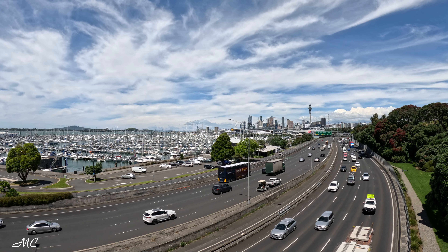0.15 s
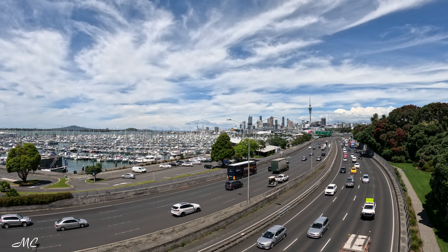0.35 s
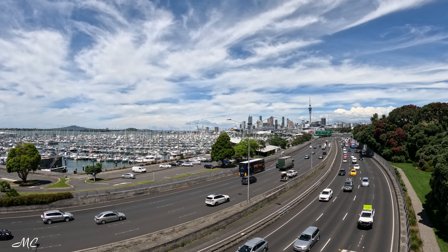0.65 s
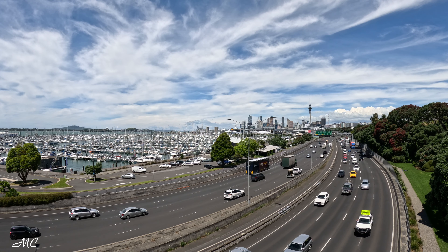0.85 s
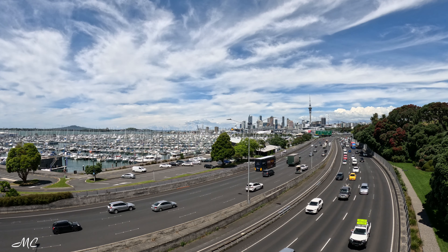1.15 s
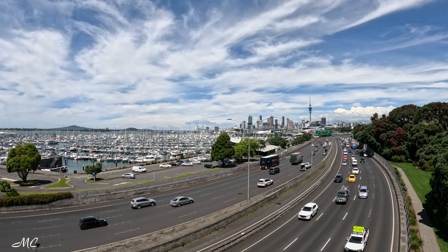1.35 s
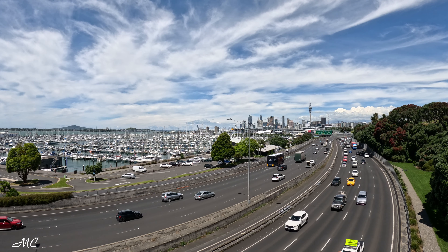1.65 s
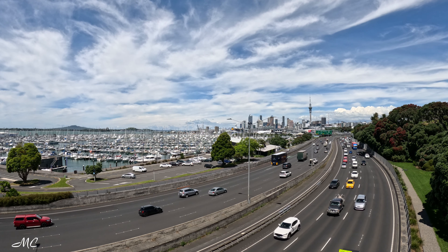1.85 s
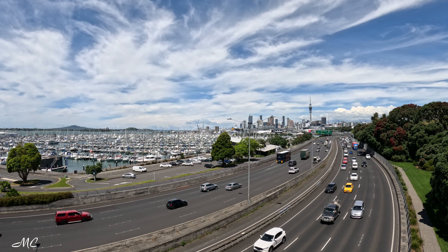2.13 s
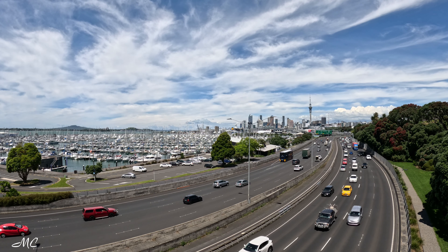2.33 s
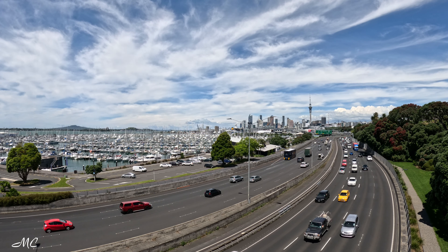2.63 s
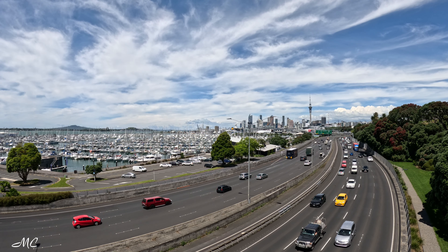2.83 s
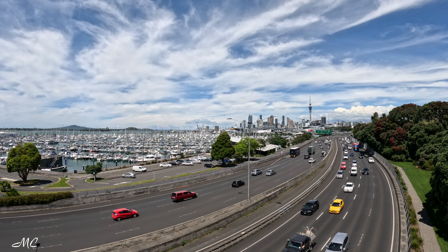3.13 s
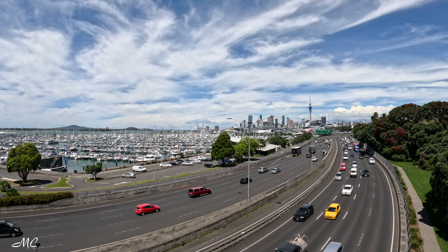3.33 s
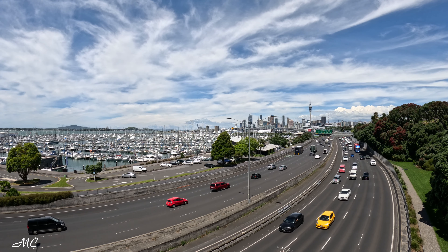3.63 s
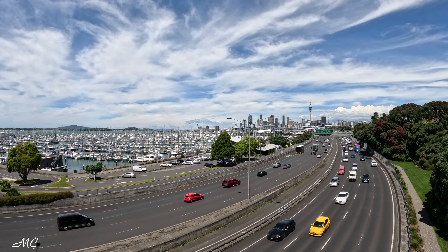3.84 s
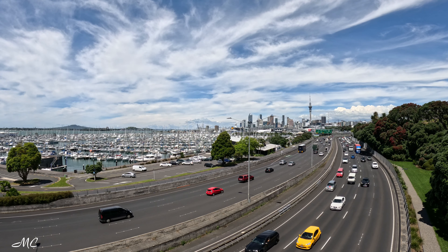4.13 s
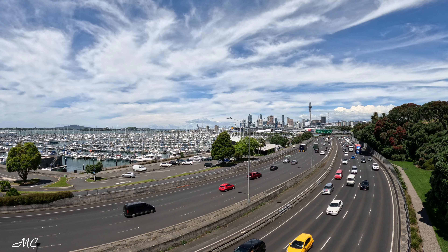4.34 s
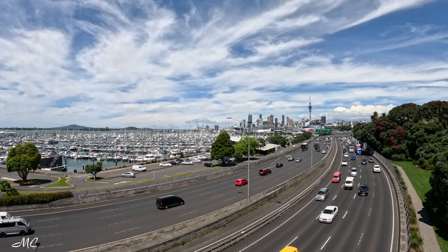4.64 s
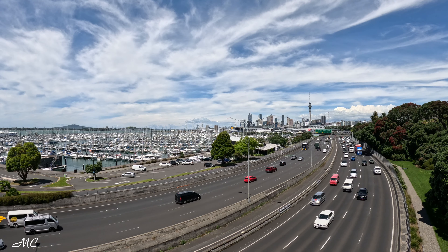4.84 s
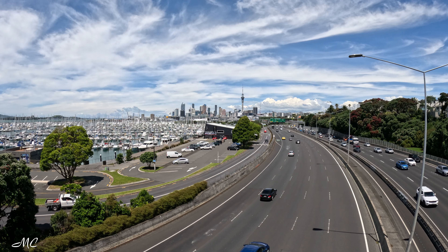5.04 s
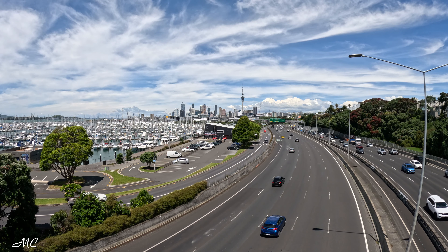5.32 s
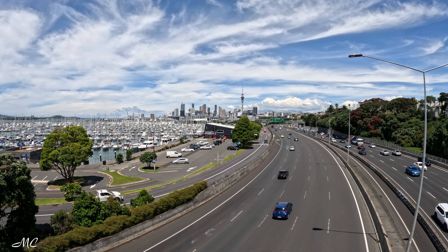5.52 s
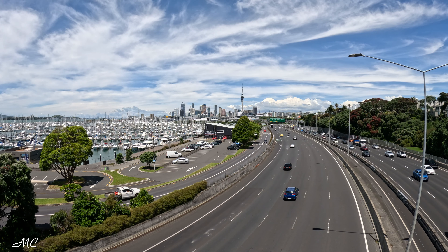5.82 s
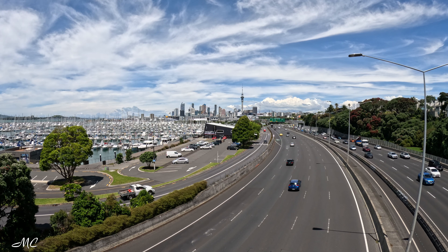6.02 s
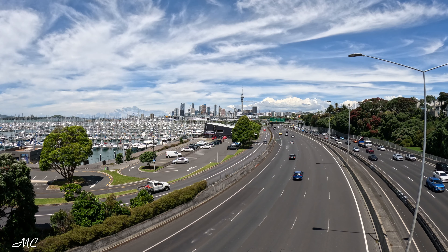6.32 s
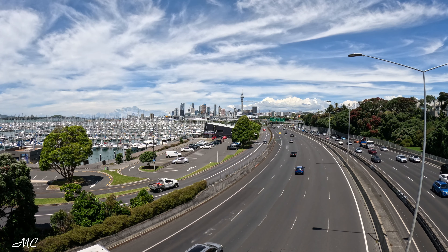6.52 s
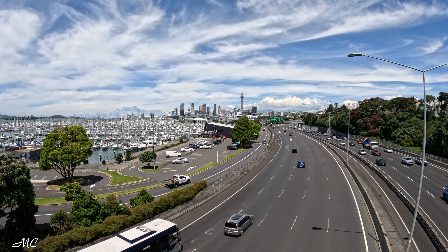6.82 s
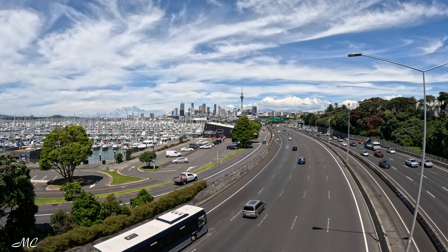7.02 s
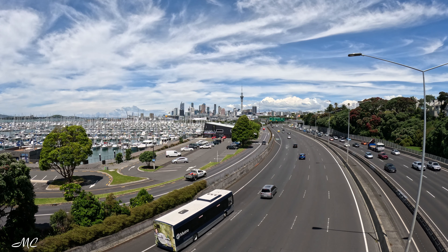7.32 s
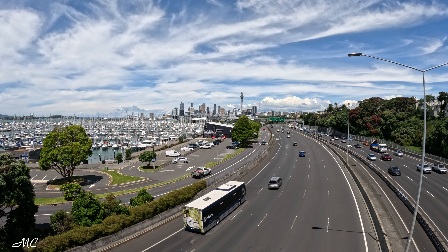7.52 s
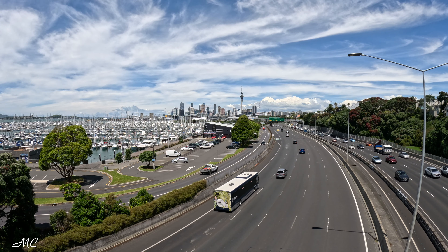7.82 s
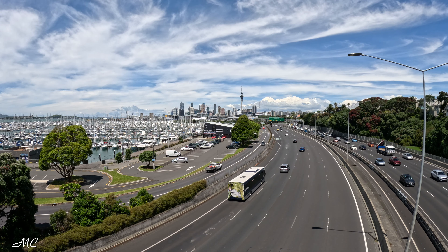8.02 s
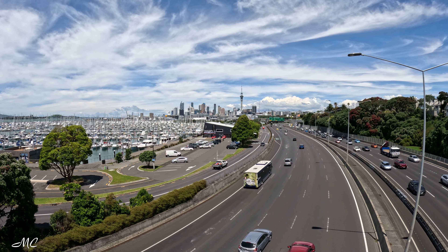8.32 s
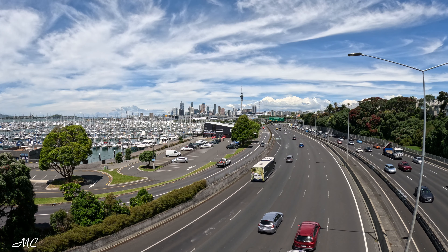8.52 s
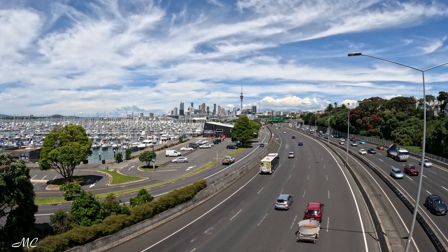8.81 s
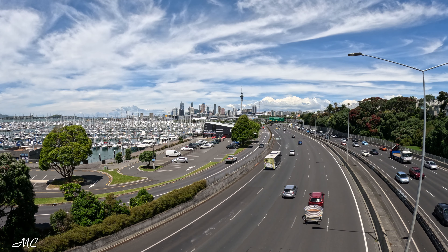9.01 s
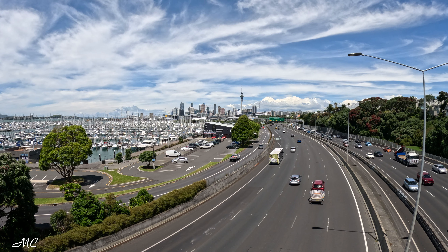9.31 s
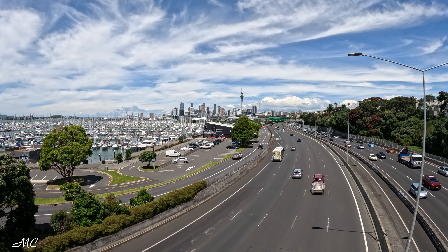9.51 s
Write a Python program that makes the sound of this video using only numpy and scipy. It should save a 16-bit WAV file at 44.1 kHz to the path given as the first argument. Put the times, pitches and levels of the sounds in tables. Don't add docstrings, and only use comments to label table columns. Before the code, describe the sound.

Open-air traffic heard from an overpass. From 0 to 4.9 s a wide, bass-heavy tyre and wind roar stays fairly steady, swelling gently, hissier at the very start when near lanes are busy. Low truck hums glide in and out beneath it; faint grit ticks fall around 0.7 to 1 s and 2.6 to 2.7 s. At 4.9 s everything stops dead for a little over a tenth of a second. From 5.05 s a second, brighter roar creeps in very quietly, growing to full by about 8 s. A bus drones low, its tone wavering in strength and sinking around 6.9 s, with airy hiss near 7.6 s. Faint jingling builds from 7 s. A trailer passes around 8.2 s: sharp knocks and bright steel clinks at 8.4 s, knocks at 8.6 and 8.75 s, a strong ring at 9.1 s, a last knock at 9.3 s, with thin singing rubs between. Roar continues to about 9.6 s.

```python
import sys
import numpy as np
from scipy import signal
from scipy.io import wavfile
from scipy.ndimage import uniform_filter1d, map_coordinates

SR = 44100
rng = np.random.default_rng(int(sys.argv[2]) if len(sys.argv) > 2 else 0)


def store_wav(level_fs):
    pcm = np.round(np.clip(np.atleast_2d(level_fs), -1, 1) * 32767)
    wavfile.write(sys.argv[1], SR, pcm.T.astype(np.int16))


def makeup_ratio(level_db):
    decades = np.asarray(level_db, float) / 20
    return 10 ** decades


N = 426006
CLOCK = np.arange(N) / SR


def evened(x):
    return x / np.sqrt(np.mean(x ** 2) + 1e-20)


def read(points, hz):
    f, value = np.transpose(points)
    return np.interp(np.log(hz + 1), np.log(f + 1), value)


def add(mix, s, sound):
    part = mix[round(s * SR):][:len(sound)]
    part += sound[:len(part)]


def wander(rate_hz, t=CLOCK):
    knots = rng.standard_normal(4000)
    return np.interp(t, t[::32], map_coordinates(knots, [t[::32] * rate_hz + 5], order=3))


def resonate(x, hz, width_hz):
    turn = np.exp(2j * np.pi * np.cumsum(hz) / SR)
    r = np.exp(-np.pi * width_hz / SR)
    return 2 * (turn * signal.lfilter([(1 - r) ** 2], [1, -2 * r, r * r], x / turn)).real


def passing(t, drop, pass_s, glide_s):
    return 1 - drop * (t - pass_s) / np.hypot(t - pass_s, glide_s)


def tick(db, t60_s, low_hz, high_hz):
    t = np.arange(4000) / SR
    burst = rng.standard_normal(4000) * makeup_ratio(db - 60 * t / t60_s) * np.minimum(t / .0005, 1)
    return signal.lfilter(*signal.butter(1, [low_hz, high_hz], "band", fs=SR), burst)


def layers(curve, far_db, near_db):
    # loudest t/s, half length/s, fizz gain/dB
    bus_air = (7.6, 0.8, 7.5)
    t = CLOCK[::1024]
    s, roar_db, near = np.transpose(curve)
    roar, near = np.interp(t, s, roar_db), np.interp(t, s, near)
    rumble, hiss, fizz = (roar + far + gain * near for far, gain in zip(far_db, near_db))
    peak_s, half_s, air_db = bus_air
    return np.transpose([t, rumble, roar, hiss, fizz + air_db * np.exp(-((t - peak_s) / half_s) ** 2)])


def road(rows, colour, tread, patchy_db=0.73, flicker_db=0.87):
    layer_hz = [110, 700, 2600, 7500]
    frames, hz = N // 256 + 5, np.fft.rfftfreq(1024, 1 / SR)
    t = np.arange(frames) * 256 / SR
    s, *levels = np.transpose(rows)
    bumps_db = sum(db * np.exp(-((hz - centre) / width) ** 2) for centre, width, db in tread)
    power = makeup_ratio(2 * read(colour, hz) + 2 * bumps_db) * (SR / 1024) * (hz > 0)

    bands_hz = [(95, 300), (350, 1400), (1700, 3600), (6000, 6800)]
    own_db = [10 * np.log10(power[(hz >= lo) & (hz < hi)].sum()) for lo, hi in bands_hz]
    shares = np.array([read(list(zip(layer_hz, one)), hz) for one in np.eye(4)])
    swell_db = shares.T @ np.array([np.interp(t, s, level) - own for level, own in zip(levels, own_db)])

    a, b, patches = rng.standard_normal((frames, 513, 3)).T
    flicker = evened(uniform_filter1d(uniform_filter1d(patches, size=200, axis=0), size=5, axis=1))
    patches = evened(uniform_filter1d(uniform_filter1d(patches, size=12, axis=0), size=14, axis=1))
    treble = np.clip(hz / 6000, 0, 1.5)[:, None]
    field_db = swell_db + patchy_db * patches + flicker_db * treble * flicker
    z = (a + 1j * b) * np.sqrt(power)[:, None] * makeup_ratio(field_db + 0.93)
    return signal.istft(z, nperseg=1024, noverlap=768)[1][:N]


def traffic():
    # t/s, tyre roar level/dB, nearness of closest lanes [0-1]
    flow = [
        [(0.0, -27.5, 0.98), (0.6, -27.5, 0.77), (1.0, -28.5, 0.74), (1.75, -26, .1), (2.4, -27, 0.32),
         (3.5, -26, 0), (4.0, -29, 0.19), (4.55, -28.5, 0.47), (4.9, -29, 0.5)],
        [(5.1, -57.5, 0.9), (5.25, -44.5, 0.56), (5.5, -44.5, .7), (6.35, -35.5, .3), (6.9, -31.5, 0.12),
         (7.4, -28.5, 0.45), (8.05, -24, 0.72), (8.5, -26, 0.63), (9.66, -25.5, 0.02)],
    ]
    # f/Hz, density/dB per Hz
    colours = [
        [(13, -36), (22, -8.5), (47, -2), (65, -1), (113, -7.5), (262, -11), (452, -19.5), (563, -14),
         (719, -12.5), (2450, -42.5), (3680, -48.5), (12600, -80), (14800, -103)],
        [(13, -47), (22, -12), (48, -3), (81, -6.5), (119, -14), (161, -9), (440, -14.5), (662, -13.5),
         (944, -15.5), (2520, -36), (3790, -40), (5250, -51), (5850, -50), (10700, -68.5), (14800, -86)],
    ]
    # f/Hz, width/Hz, level/dB
    treads = [
        [(1200, 200, 0.1), (8040, 860, 3.5)],
        [(1160, 180, 2.5), (2560, 210, 0.5)],
    ]
    far_db = [(0.5, -20, -47), (0.5, -19.5, -40)]
    near_db = [(4.5, 8.7, 8.4), (0.38, 7.8, 1.2)]
    return [road(*view) for view in zip(map(layers, flow, far_db, near_db), colours, treads)]


def hum(s, hz, db, waver=0.00601):
    out, live = np.zeros(N), (CLOCK > s[0] - .02) & (CLOCK < s[-1] + 0.056)
    t = CLOCK[live]
    pitch_hz = np.interp(t, s, hz) * (1 + waver * wander(5.0, t))
    edge = np.clip(np.minimum(t - s[0] + 0.023, s[-1] + 0.049 - t) / 0.042, 0, 1)
    tone = np.sin(2 * np.pi * (np.cumsum(pitch_hz) / SR + rng.random()))
    out[live] = np.sqrt(2) * makeup_ratio(np.interp(t, s, db)) * edge * tone
    return out


def vehicle(start_s, end_s, start_hz, end_hz, db):
    rise, edge_db = .15, -8
    share = np.array([0, rise, 1 - rise, 1])
    return hum(start_s + share * (end_s - start_s), start_hz + share * (end_hz - start_hz),
               db + edge_db * np.array([1, 0, 0, 1]))


def engines():
    # t/s, level/dB
    bus_level = [(5.2, -48.5), (5.7, -36.5), (6.0, -35), (6.33, -23.5), (6.6, -32.5), (7.0, -21),
                 (7.4, -35), (7.78, -20), (8.5, -23), (9.33, -21.5), (9.6, -38)]
    # multiple of firing f, level re firing tone/dB
    orders = [(2.0, -19), (3.0, -19.5), (4.0, -22.5)]
    # start/s, end/s, start f/Hz, end f/Hz, level/dB
    truck_rows = [(0.0997, 1.2, 62.5, 64.5, -23.5), (1.0, 1.75, 67, 66.5, -26),
                  (1.75, 2.95, 66.7, 67, -23.5), (3.0, 3.55, 66.6, 66, -26), (3.65, 4.0, 66.6, 67.5, -23),
                  (4.05, 4.8, 66.6, 66.6, -26), (0.07, 0.85, 172, 167.5, -26), (0.95, 1.3, 180, 165, -31),
                  (3.98, 4.92, 50.5, 49.5, -22), (1.9, 2.16, 83, 84, -25.5), (2.2, 2.7, 97, 82.5, -27.5),
                  (2.35, 3.45, 128.5, 127, -30), (0.8, 1.6, 52, 51, -29.5), (1.7, 2.0, 70, 78, -23.5),
                  (3.35, 3.98, 60, 71.5, -21.5), (3.45, 3.75, 142, 160, -30), (1.2, 1.45, 118, 118, -28.5),
                  (0.3, 1.7, 92, 100, -32.5), (2.3, 3.4, 49, 50, -28.5)]
    # start/s, end/s, start f/Hz, end f/Hz, level/dB
    behind_rows = [
        (5.3, 6.4, 121, 118.5, -43),
        (6.501, 7.5, 119, 120.2, -39.5),
        (7.7, 8.1, 119, 119, -33),
        (8.12, 8.6, 120.5, 120.1, -26),
        (8.62, 9.66, 121, 120.7, -32),
        (9.0, 9.6, 145.6, 149.2, -32),
    ]
    s, firing_db = np.transpose(bus_level)
    hz = 84.37 * passing(s, drop=.055, pass_s=6.85, glide_s=.7)
    bus = hum(s, hz, firing_db) + sum(hum(s, k * hz, firing_db + db) for k, db in orders)
    trucks, behind = (sum(vehicle(*row) for row in rows) for rows in (truck_rows, behind_rows))
    return trucks, bus + behind


def doppler(t):
    return 1.031 * passing(t, drop=.043, pass_s=8.23, glide_s=.38)


def clinks():
    mode_hz = [3770, 5500, 7170, 9250, 11680, 12090, 14950, 6050]
    # spread/Hz, flash t60/s, after-ring t60/s, after-ring level/dB, column of spots, level/dB
    modes = [(50, .15, .3, -6, 3, 8), (24, .11, 1.3, -12, 0, 0), (60, .08, .7, -23, 1, 0),
             (25, .12, .6, -18, 2, 0), (22, .15, .45, -8, 3, -3), (22, .15, .45, -8, 3, -4),
             (60, .12, .1, -20, 2, -24), (90, .03, .05, -30, 0, -9)]
    # level/dB of the 5.5, 7.2, 9.3, 12 kHz modes
    spots = [(-4, -22, -7, -14), (3, -26, -29, -26), (-9, 7.5, -14.5, -11.5), (3, 5, -14, -16.5),
             (-1, -21, -11.5, -36)]
    # t/s, length/s, level/dB
    blows = [
        [(8.127, .09, -52), (8.15, 0.082, -52)],
        [(8.42, 0.077, -40), (8.447, 0.07, -35), (8.53, 0.17, -47), (9.26, .17, -54)],
        [(8.362, .04, -47.5), (8.749, .07, -43.5), (9.32, .05, -61)],
        [(8.38, 0.22, -36), (8.757, .05, -57)],
        [(9.082, .2, -33)],
    ]
    out, t = np.zeros(N), np.arange(SR // 3) / SR
    flicker = makeup_ratio(3.5 * wander(75.0))
    for spot_db, rows in zip(spots, blows):
        for s, length_s, blow_db in rows:
            turns = np.cumsum(doppler(s + t)) / SR
            ring = np.zeros(len(t))
            for hz, (spread_hz, flash_t60_s, t60_s, after_db, column, db) in zip(mode_hz, modes):
                detune, phase = rng.uniform(-1, 1, (2, 3, 1))
                flash_hz, after_hz = hz + 20 + 3 * spread_hz * detune, hz + spread_hz * detune
                flash = np.sin(2 * np.pi * flash_hz * turns + np.pi * phase).sum(axis=0)
                after = np.sin(2 * np.pi * after_hz * turns + 3 * np.pi * phase).sum(axis=0)
                both = makeup_ratio(-60 * t / flash_t60_s) * flash + makeup_ratio(after_db - 60 * t / t60_s) * after
                ring += makeup_ratio(blow_db + spot_db[int(column)] + db) * both
            add(out, s, ring * np.minimum(t / .004, 1) * np.clip((length_s - t) / .03, 0, 1))
    return out * flicker


def knocks():
    # t/s, level/dB, t60/s
    hits = [
        (8.358, -48, .025),
        (8.383, -44.5, .06),
        (8.402, -31.5, 0.033),
        (8.624, -27, 0.067),
        (8.735, -29, 0.024),
        (8.75, -39, .1),
        (9.083, -36.5, .04),
        (9.304, -32.5, .06),
    ]
    out = np.zeros(N)
    for s, db, t60_s in hits:
        add(out, s, tick(db, t60_s, 3400, 5200))
    return out


def rattle():
    # t/s, level/dB
    jolts = [(6.35, -78), (6.75, -73), (7.03, -71), (7.18, -69), (7.26, -69), (7.36, -60.5), (7.49, -60),
             (7.56, -61.5), (7.9, -62), (7.98, -67), (8.13, -69), (8.385, -59), (8.627, -67), (8.752, -59),
             (9.087, -66), (9.307, -72.5)]
    # loudest t/s, half length/s, level/dB
    leaving = (9.0, 1.1, -74)
    bed = (7.3, .75, -66)
    fall_s, rise_share = .055, .35
    t = CLOCK[::64]
    noise = rng.standard_normal(N) * makeup_ratio(1.5 * wander(40.0))
    shift = doppler(CLOCK)
    # f/Hz, width/Hz, level/dB
    wide = [(2400, 410, 16.0), (3650, 320, 5.5), (5500, 200, -9.0), (6680, 1500, 8.5), (9400, 1800, 3.0),
            (11330, 1400, 1.0), (13000, 1500, -8.0)]
    rings = sum(makeup_ratio(db) * evened(resonate(np.roll(noise, int(hz)), hz * shift, width_hz))
                for hz, width_hz, db in wide)
    shake = sum(makeup_ratio(db) * np.exp(-((t - s) / half_s) ** 2) for s, half_s, db in (bed, leaving))
    shake += sum(makeup_ratio(db) * np.exp(-((t - s) / np.where(t < s, rise_share * fall_s, fall_s)) ** 2)
                 for s, db in jolts)
    return makeup_ratio(-8.0) * np.interp(CLOCK, t, shake) * rings


def singing():
    # start/s, end/s, level/dB
    rubs = [
        (7.63, 7.7, -55),
        (7.95, 8.07, -55),
        (8.13, 8.225, -48),
        (8.235, 8.34, -51),
        (8.544, 8.667, -45.5),
        (9.115, 9.177, -40),
        (9.19, 9.28, -51.5),
        (9.31, 9.41, -58),
    ]
    line = evened(resonate(rng.standard_normal(N), 5485 * doppler(CLOCK), width_hz=24))
    return line * sum(makeup_ratio(db) * np.clip(np.minimum(CLOCK - start, end - CLOCK) / .015, 0, 1)
                      for start, end, db in rubs)


def grit():
    # t/s, level/dB
    flicks = [
        (0.6624, -52),
        (0.9343, -55),
        (1.045, -50.5),
        (2.5646, -44.5),
        (2.6632, -46),
        (2.7142, -48),
    ]
    out = np.zeros(N)
    for s, db in flicks:
        add(out, s, tick(db - 4, .025, 4000, 7200))
    return out


def edit():
    cut_s, fade_s = 4.9095, 5.05
    past_s = CLOCK - cut_s
    cut = np.clip(.5 - past_s / 0.00092, 0, 1)
    tail = makeup_ratio(-62 - 60 * np.maximum(past_s, 0) / 0.03)
    cut = np.maximum(cut ** 2 * (3 - 2 * cut), tail)
    return cut + np.clip((CLOCK - fade_s) / 0.078, 0, 1) ** 2


def scene():
    first, second = traffic()
    first = first + grit()
    trucks, bus = engines()
    trailer = clinks() + knocks() + rattle() + singing()
    return np.where(CLOCK < 4.98, first + trucks, second + bus + trailer)[None]


def roll_off(x):
    return signal.sosfilt(signal.butter(12, 14930, fs=SR, output="sos"), x)


def record(dry):
    thinned = signal.lfilter(*signal.butter(1, 24, "high", fs=SR), dry)
    return roll_off(edit() * 0.71 * np.tanh(thinned / 0.72))


dry = scene()
out = record(dry)
store_wav(out)
```